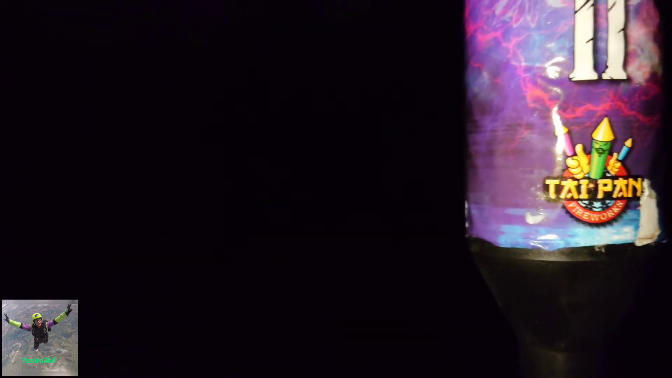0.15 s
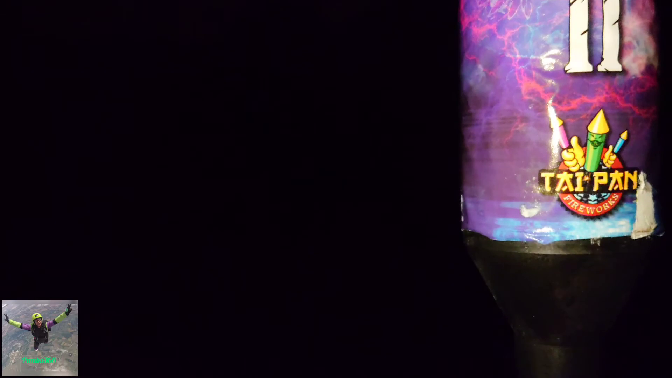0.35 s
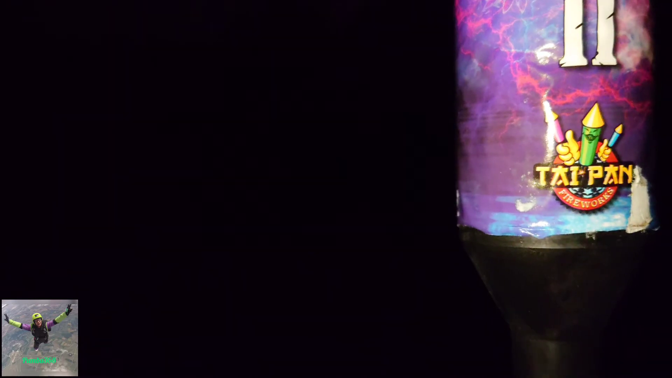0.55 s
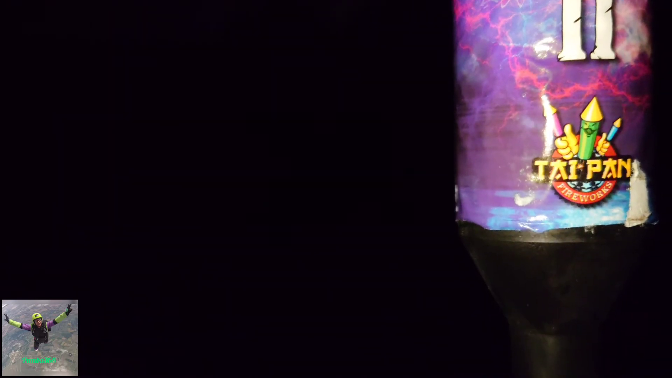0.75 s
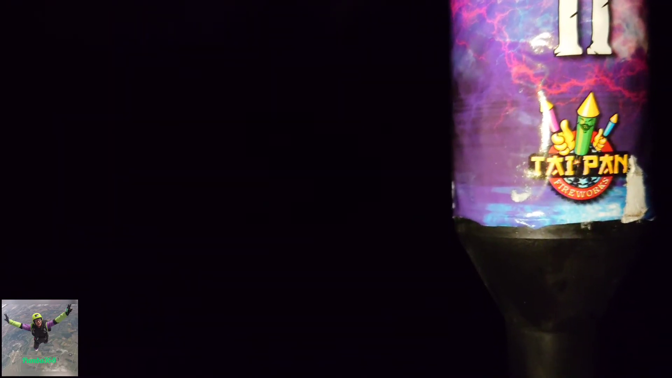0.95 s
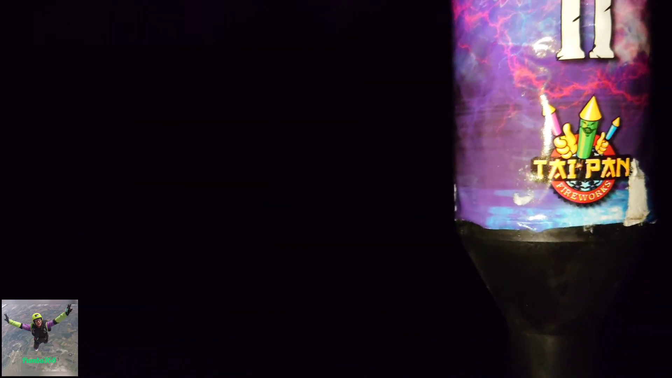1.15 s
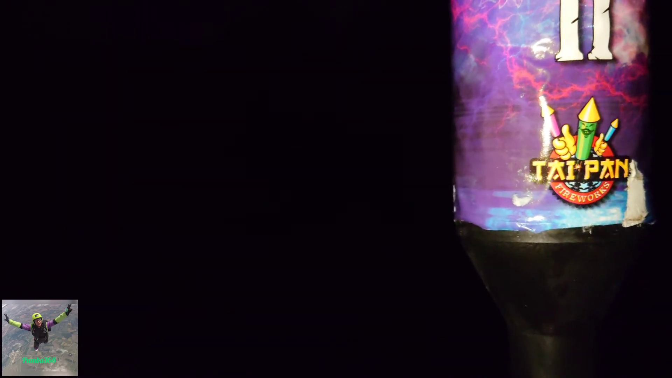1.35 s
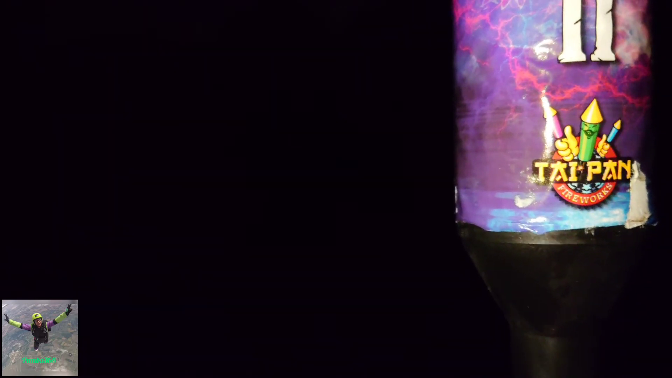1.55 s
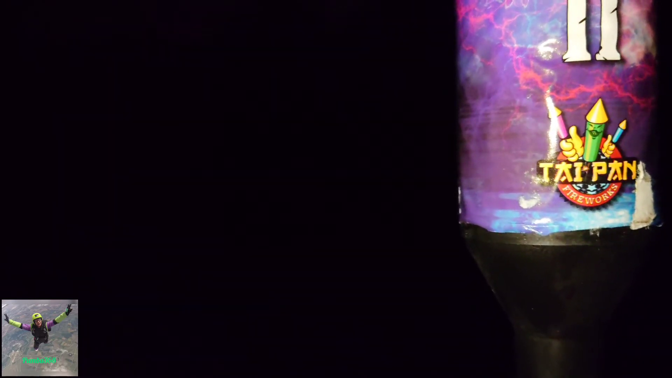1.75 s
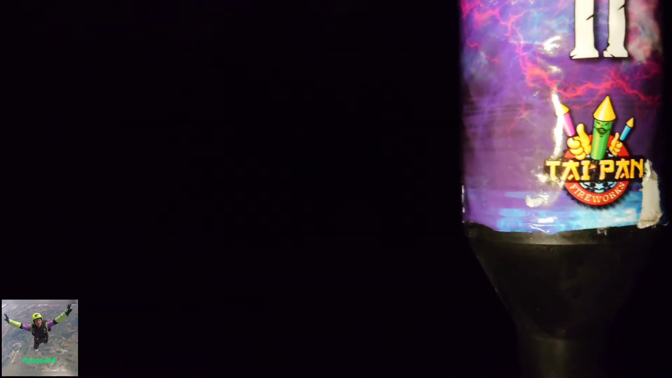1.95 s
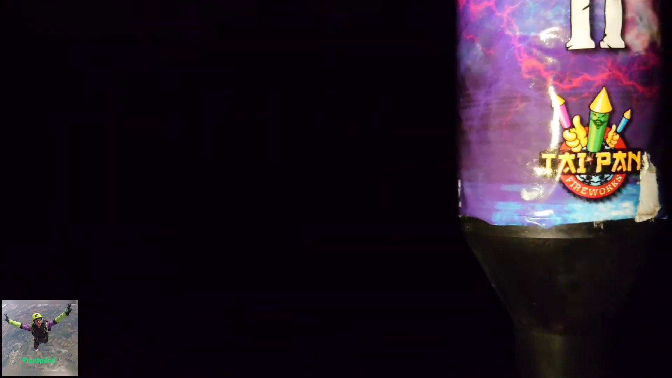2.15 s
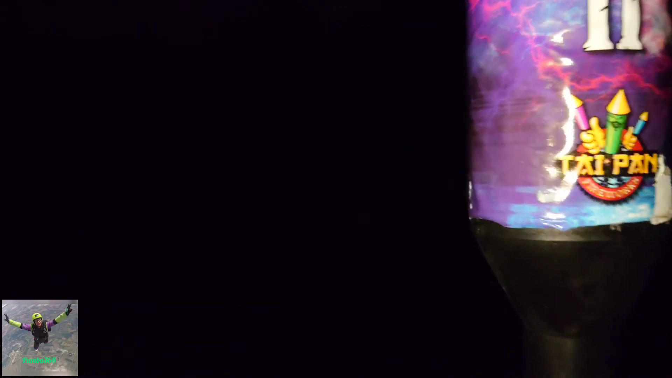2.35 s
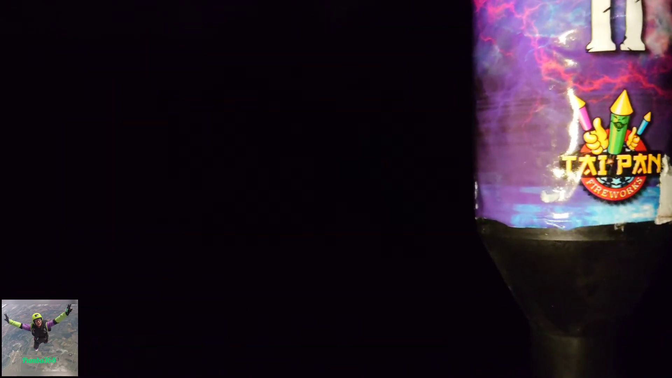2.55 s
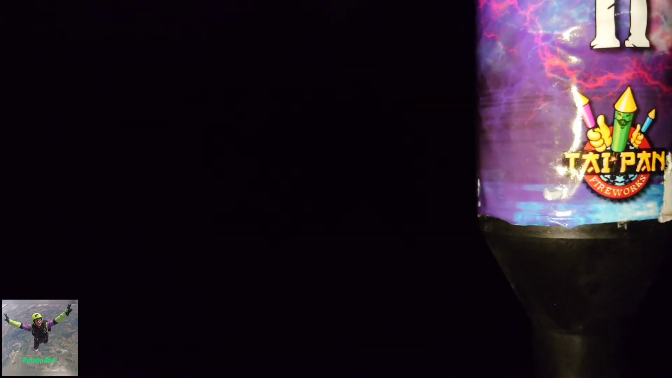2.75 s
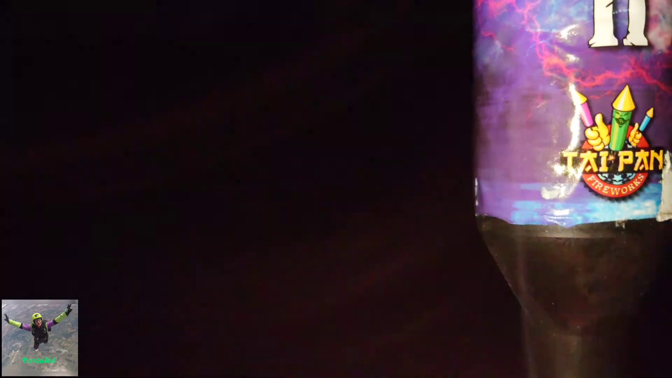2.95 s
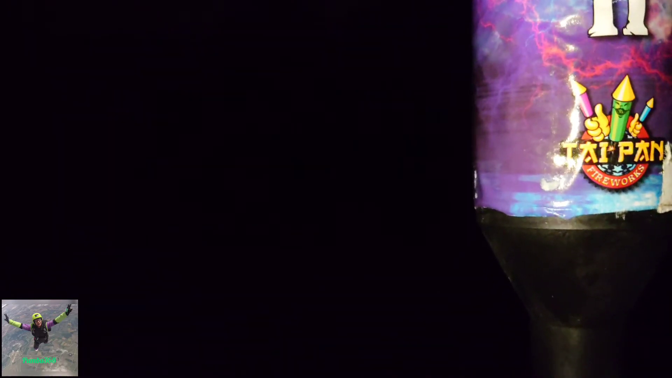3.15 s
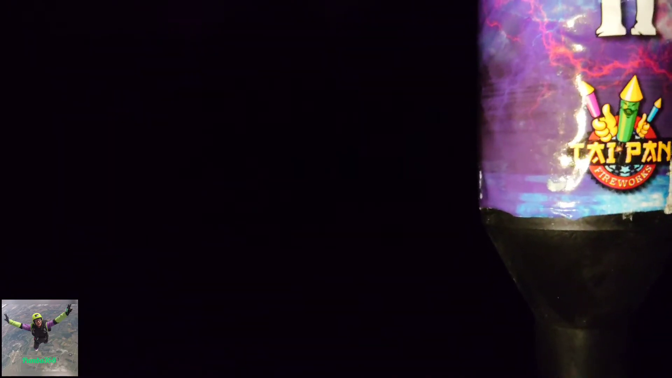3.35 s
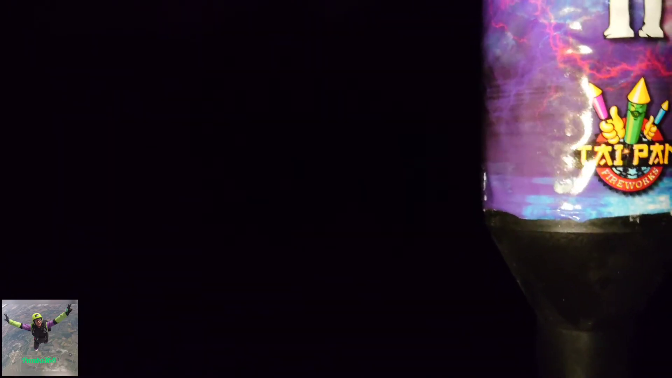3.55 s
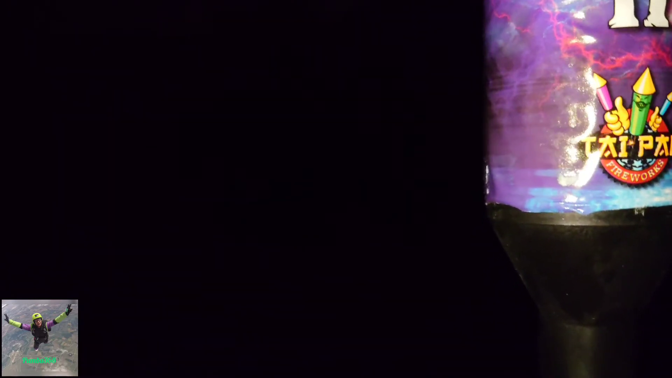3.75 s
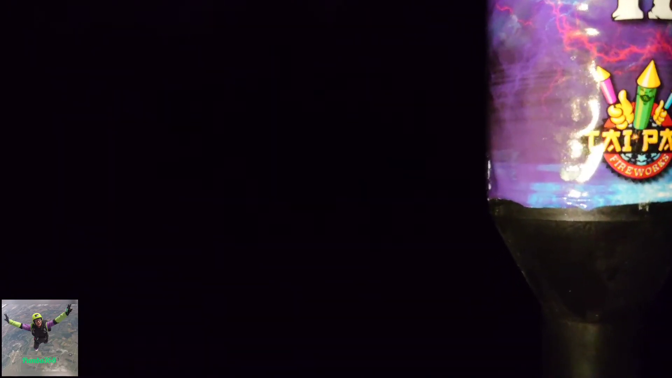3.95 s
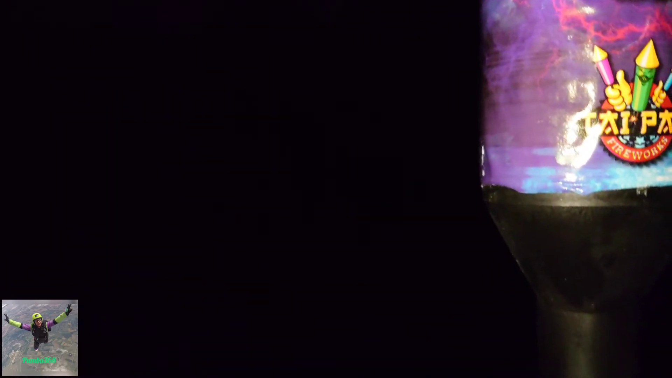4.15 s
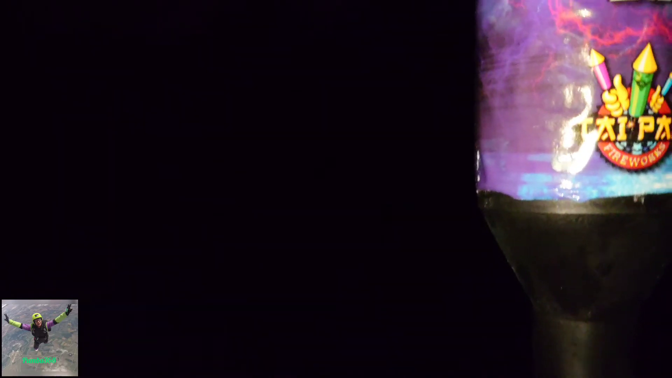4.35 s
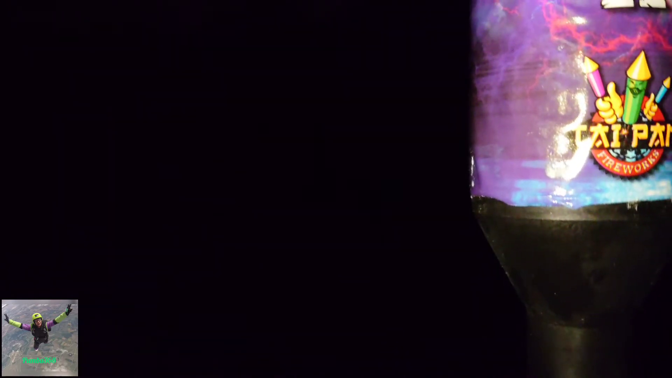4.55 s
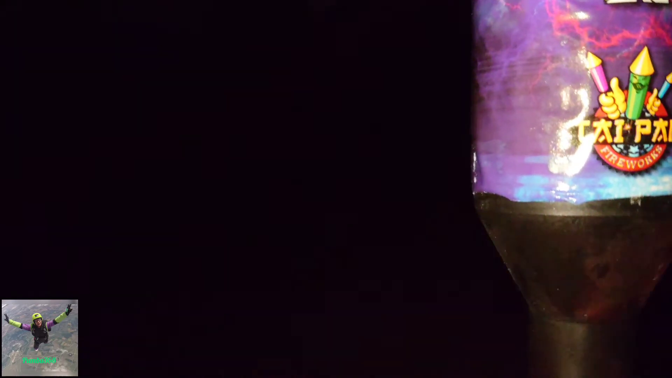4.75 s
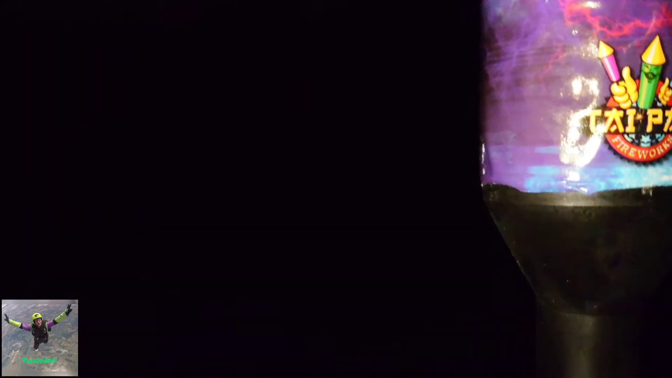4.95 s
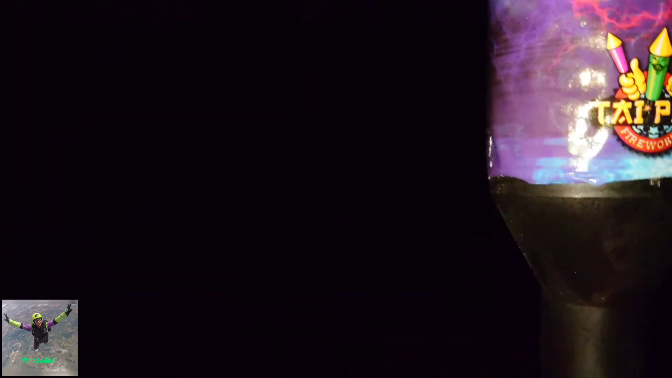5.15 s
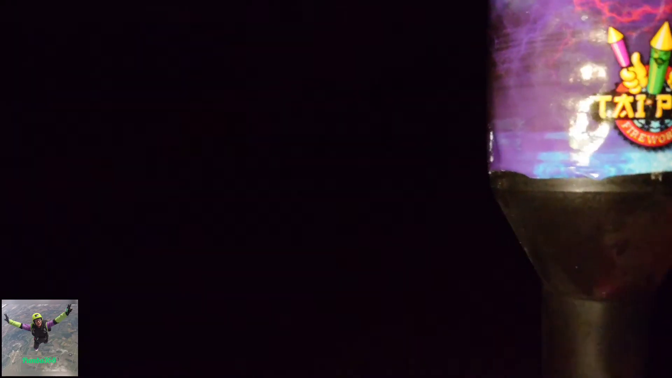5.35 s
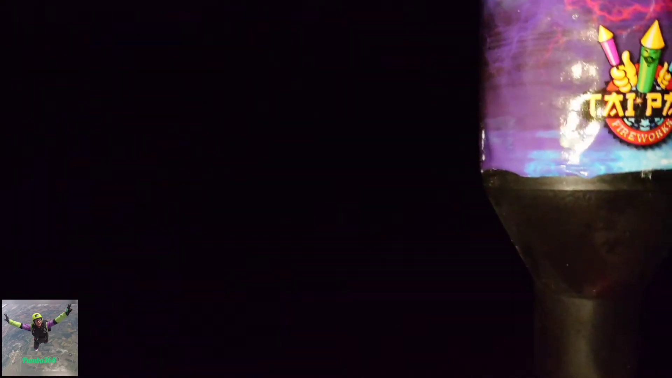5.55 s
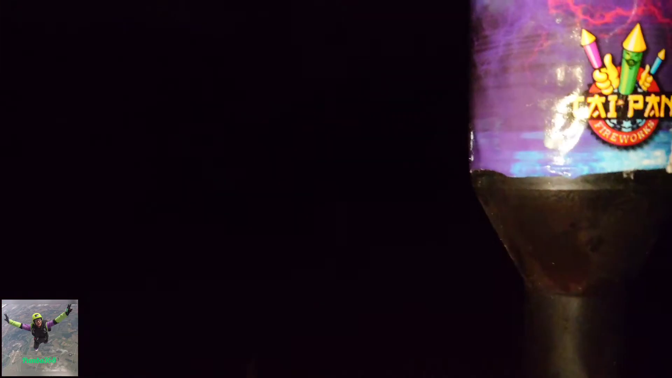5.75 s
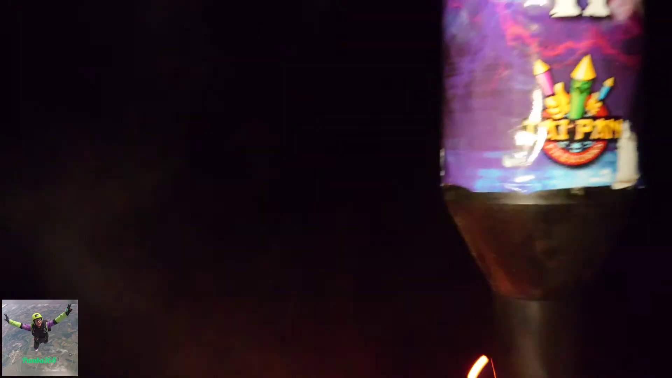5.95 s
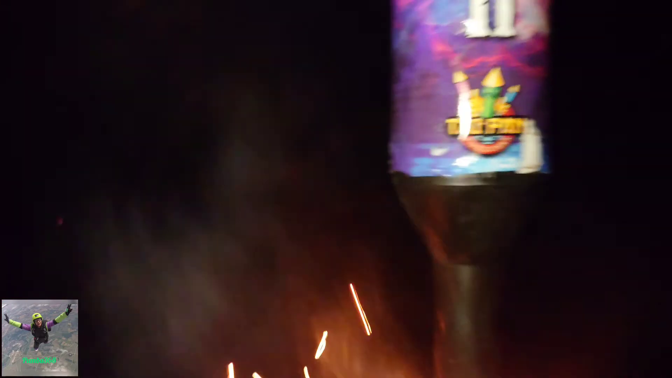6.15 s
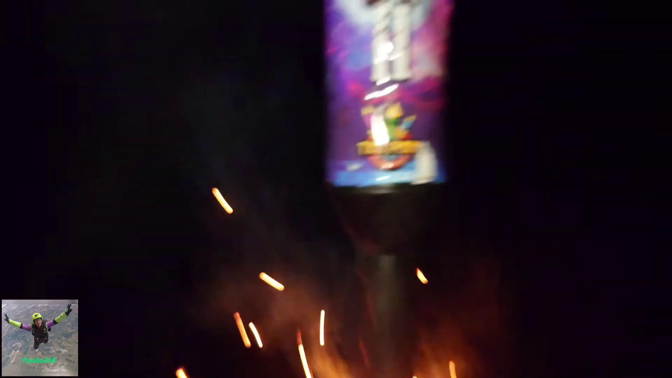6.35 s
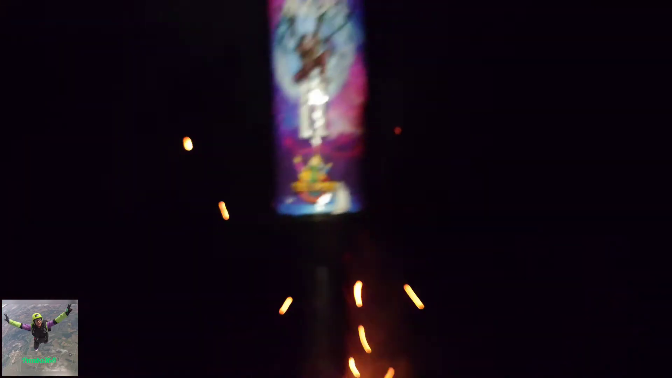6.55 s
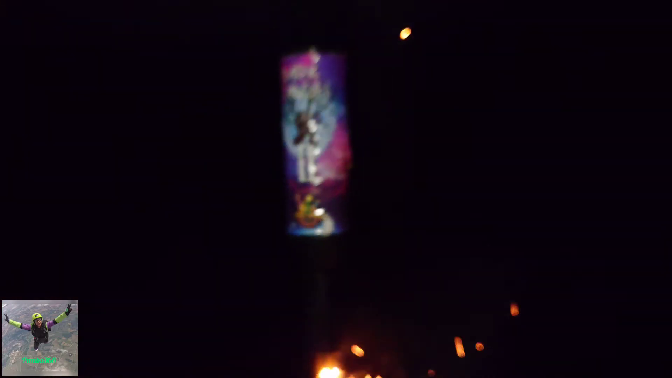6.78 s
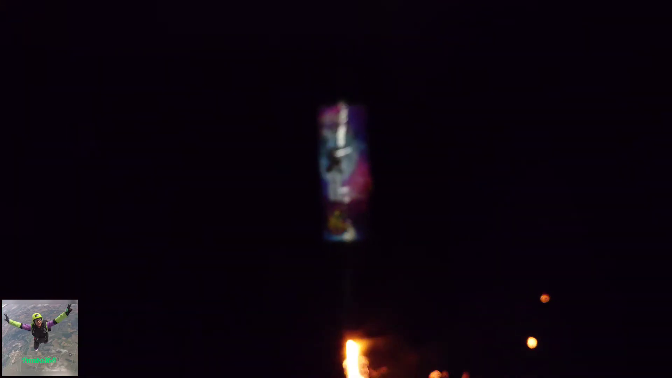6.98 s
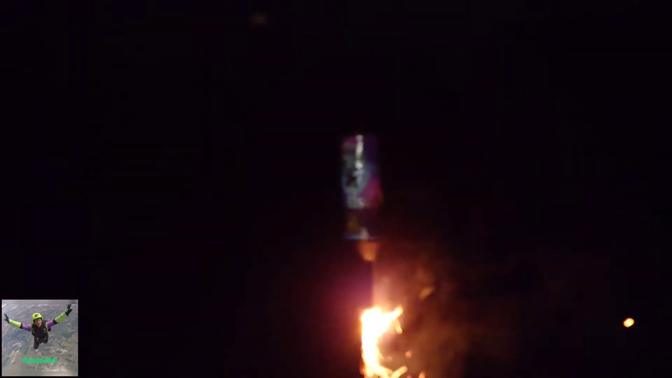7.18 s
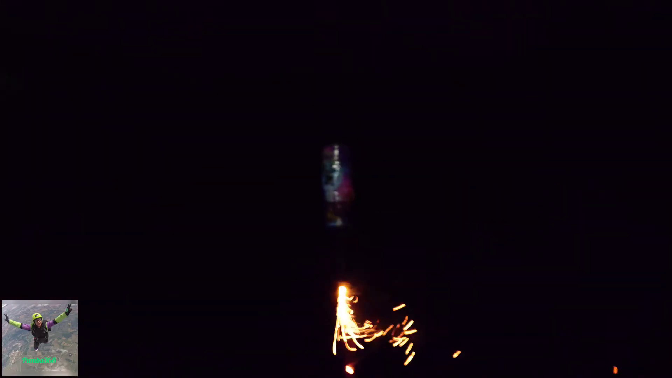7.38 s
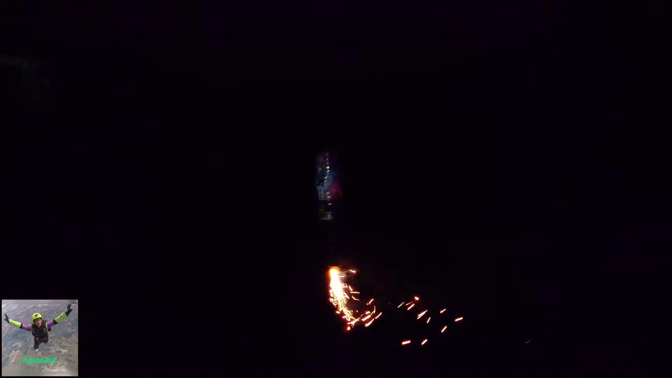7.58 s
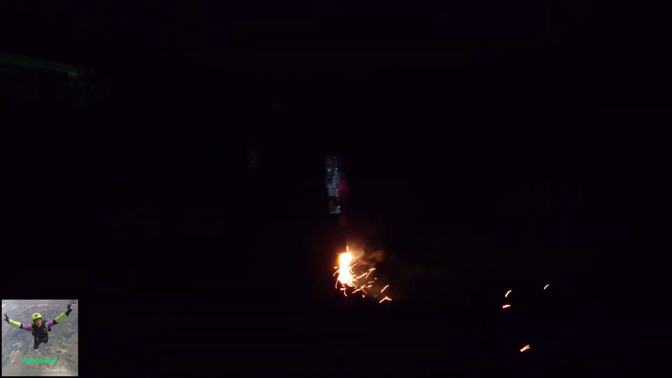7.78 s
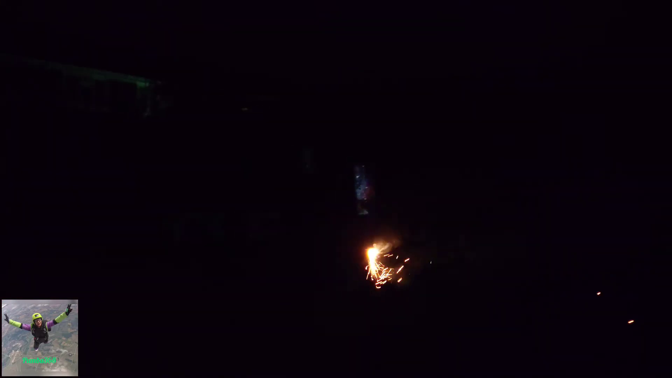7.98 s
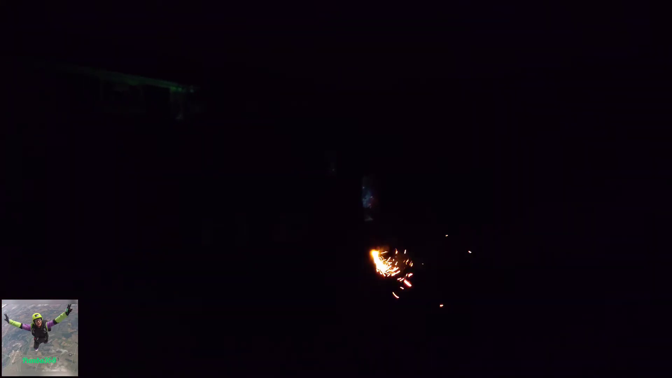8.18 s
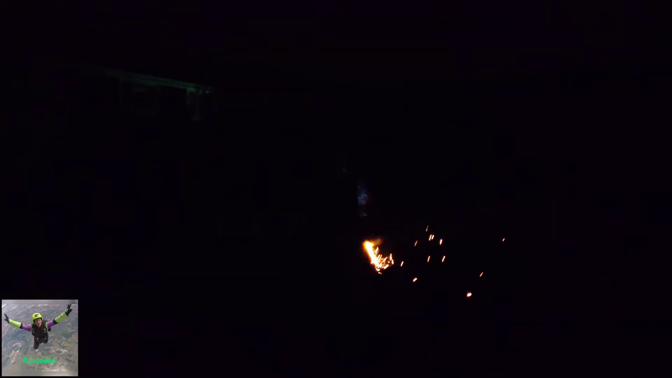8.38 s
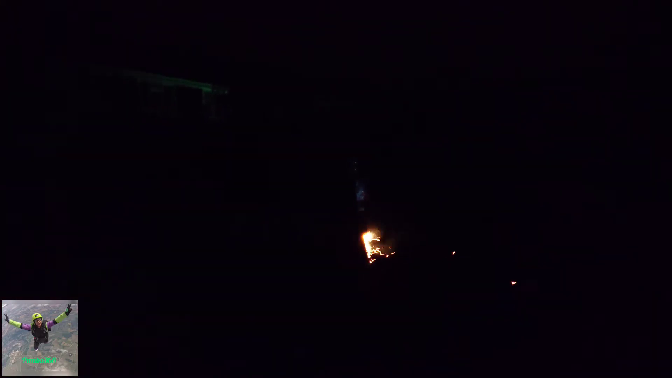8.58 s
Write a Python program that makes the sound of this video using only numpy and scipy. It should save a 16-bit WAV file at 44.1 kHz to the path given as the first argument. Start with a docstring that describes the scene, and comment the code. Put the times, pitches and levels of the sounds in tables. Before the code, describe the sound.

Sharp flint clicks in a quiet night yard, brief gritty sputtering, then a sudden fierce fizzing jet that fades as the microphone backs away.

```python
"""A firework fuse sprays sparks at night: a turbulent jet, made of gritty noise split into roar, hiss and fizz.
Before it the fuse spits, as short bursts of grainy noise; late in the spray an ember bursts with a thud and a crack.
First a lighter's flint wheel is nudged twice and fully struck five times: scrapes, snaps and knocks of shaped noise.
A hand-held phone backs away from the spray; its two microphone ports differ in colour, delay and correlation.
Beneath lie a faint yard echo, distant night noise, light air on the ports and the rustle of the hand."""
import sys
import numpy as np
from scipy import signal
from scipy.fft import rfft, irfft, next_fast_len
from scipy.io import wavfile
from scipy.ndimage import uniform_filter1d, map_coordinates

SR = 44100
rng = np.random.default_rng(int(sys.argv[2]) if len(sys.argv) > 2 else 0)


def transcribe(u):
    """Save the signal u as a 16-bit wav file named by the first command-line argument.

    u: samples, shape (n,) or (channels, n), limited to [-1, 1]; the rate is SR.
    q: integer samples, one column per channel.
    """
    v = np.clip(np.atleast_2d(u).T, -1, 1)
    q = np.round(v * 32767).astype(np.int16)
    wavfile.write(sys.argv[1], SR, q)


N = 380141

IGNITE_S = 5.624  # the powder ignites
# Spectrum of the jet. Each row: frequency in Hz, relative level per Hz in dB.
JET_SPECTRUM = [(60, -26), (110, -17.5), (200, -7), (450, -1.5), (1100, -2.5), (2000, 1.5), (3400, 3),
                (4800, -0.3), (6400, -9), (7900, -2.5), (11000, -6.5), (13000, -4), (15800, -7.5)]
# Spectrum of sparks and bursting grains. Each row: frequency in Hz, relative level per Hz in dB.
FLINT_SPECTRUM = [(200, -21), (700, -21.5), (1800, -3), (3100, 1.5), (4500, 0), (6400, -2), (7900, 4),
                  (9800, -5.5), (12500, 0), (15300, 3), (16000, -7)]
# Low boom of the flame while the phone is close. One row: centre in seconds, half-length in seconds,
# level relative to the hiss in dB.
BOOM = (6.24, 0.2, -27)
# The hiss takes on a bright edge. Each row: centre in seconds, half-length in seconds, frequency in Hz,
# half-width in Hz, boost in dB.
BRIGHT_EDGES = [(6.711, 0.19, 7950, 1510, 6), (8.303, 0.38, 4600, 700, 4.5)]
# The phone backs away. Each row: time in seconds, distance in metres, delay of the left port behind
# the right in milliseconds, port colour from 0 close, 1 a step back, 2 away to 3 far (held at 3 above that).
PHONE_PATH = [(5.78, .19, 0.34, 0), (6.02, 0.22, 0.26, 0.5), (6.25, 0.37, .24, 0.15),
              (6.5, 0.32, 0.17, 1.5), (6.75, 0.42, 0.13, 0.85), (7.15, 0.82, 0.2, 1.4),
              (7.7, 1.29, 0.15, 2), (7.93, 1.79, .21, 2.5), (8.6, 2.12, 0.2, 3.5)]
# Similarity of the two ports. Each row: frequency in Hz, correlation from 0 to 1.
PORT_LIKENESS = [(60, .45), (300, 1), (1000, 1), (2000, 0.79), (2600, 1), (3200, 0.89), (3900, 0.43),
                 (5200, 0.15), (7700, 0.64), (10000, .22), (15000, 0.21)]
# Left port relative to right at four places along the path. Each row: frequency in Hz, gain in dB.
PORT_CLOSE = [(500, -1.2), (1100, 3), (2000, 7.5), (3000, -6), (4000, -2.5), (5000, -1.5), (6200, -1.5),
              (7400, -3), (8600, -12), (9700, -16), (11500, 5), (13000, 0.5), (15500, -11.5)]
PORT_STEP_BACK = [(500, -0.5), (1100, 1.1), (2000, 6), (3000, 1.5), (4000, -18), (5000, -16), (6200, 4.5),
                  (7400, 4), (8600, -5), (9700, 0), (11500, -10), (13000, 2), (15500, -3.5)]
PORT_AWAY = [(500, -3), (1100, 3.5), (2000, 6), (3000, 5), (4200, -11), (5000, -13), (6200, -3), (7400, 1),
             (8600, -3.5), (9700, -1), (11500, -6), (13000, -9), (15500, 0)]
PORT_FAR = [(500, -2.5), (1100, 1), (2200, 6.5), (3000, 2.5), (4100, -13), (4900, -6), (6200, -15),
            (7600, -10), (8700, -10), (9800, 0.5), (11500, -7), (13000, -5), (15500, -5)]


def spray():
    """Turbulent mixing noise: burning powder drives a jet with a low roar, a hiss and a fizz of bursting grains."""
    level_db, roar_db, fizz_db = burn()
    lit = np.clip((clock() - IGNITE_S) / 0.008, 0, 1)
    jet = coloured(patchy(gritty(grain_db=1.16, rate=3000), depth_db=1.5), JET_SPECTRUM)

    def below(hz, edge_hz):
        """Low-pass response: nearly full gain below the edge, falling steeply above."""
        return 1 / (1 + (hz / edge_hz) ** 8)

    roar = unit(filtered(jet, lambda hz: below(hz, 1240)))
    hiss = unit(filtered(jet, lambda hz: below(hz, 5660) - below(hz, 1300)))
    fizz = unit(filtered(jet, lambda hz: 1 - below(hz, 5380)))
    # single grains burst with a tiny crack, 45 a second on average
    cracks = (rng.random(N) < 45 / SR) * rng.standard_normal((2, N)) * amp(19.0)
    treble = fizz + coloured(cracks, FLINT_SPECTRUM)
    roar_gain = amp(roar_db + 0.14 * wobble(30))
    treble_gain = amp(fizz_db + 0.73 * wobble(25))
    flow = hiss + roar_gain * roar + treble_gain * treble
    boom_s, boom_length, boom_db = BOOM
    boom = unit(band(jet, centre_hz=140, width_hz=45))
    flow = flow + amp(boom_db) * swell(boom_s, boom_length) * boom
    for s, half_length, hz, width_hz, db in BRIGHT_EDGES:
        flow = flow + (amp(db) - 1) * swell(s, half_length) * band(flow, hz, width_hz)
    pair = lit * amp(level_db + 0.76 * wobble(45)) * flow
    # the left port's colour crossfades between neighbouring places on the path
    position = np.clip(curves(PHONE_PATH)[2], 0, 3)
    heard = np.zeros((2, N))
    for place, shade in enumerate([PORT_CLOSE, PORT_STEP_BACK, PORT_AWAY, PORT_FAR]):
        share = np.clip(1 - abs(position - place), 0, 1)
        heard += share * ports(pair, PORT_LIKENESS, shade)
    return heard


JET_DB = -44  # hiss at 1 m, before flares and flicker
ATTACK_S, ATTACK_DB = 0.074, 15.5  # build-up time, and how far below full level the jet begins
# The jet flares up. Each row: centre in seconds, half-length in seconds, change of the whole jet in dB,
# additional change of the roar in dB.
FLARES = [(5.746, 0.021, 2, -2), (6.127, 0.035, 2, 1), (6.487, .05, 0.5, 1), (6.99, 0.12, 1.5, -2),
          (7.267, 0.057, 1, 2.5), (7.45, 0.033, 2, 4), (8.315, 0.073, 4, -4)]
# Balance of the jet. Each row: time in seconds, roar relative to the hiss in dB, fizz likewise in dB.
JET_COLOUR = [(5.7, -8.5, -1), (6.3, -5.5, 3), (6.8, -10.5, 1.5), (7.2, -11, -2.5), (7.7, -9.5, 4.5),
              (8.2, -5, 3.5), (8.6, -6, 3)]


def burn():
    """Spherical spreading: level falls 6 dB per doubled distance, under the build-up and flares of the jet."""
    distance_m = curves(PHONE_PATH)[0]
    roar_db, fizz_db = curves(JET_COLOUR)
    build_up = np.clip((clock() - IGNITE_S) / ATTACK_S, 0, 1)
    level_db = JET_DB - 20 * np.log10(distance_m) - ATTACK_DB * (1 - build_up)
    for s, half_length, db, extra_roar_db in FLARES:
        flare = swell(s, half_length)
        level_db = level_db + db * flare
        roar_db = roar_db + extra_roar_db * flare
    return level_db, roar_db, fizz_db


CATCH_S = 5.33  # random short spits fill in from here until the powder ignites
SPITS_PER_S, SPIT_DB, SPIT_SCATTER_DB, SPIT_S = 45, -50.5, -4, 0.003  # the random spits
# Spits at set times. Each row: start in seconds, level in dB before the mix gains, length in seconds.
SET_SPITS = [(5.223, -52, .015), (5.251, -50, 0.023), (5.378, -41.5, 0.0082), (5.395, -45, 0.013),
             (5.417, -51, 0.014), (5.457, -49.5, 0.015), (5.472, -43.5, 0.0097), (5.502, -44.5, 0.016),
             (5.56, -51, 0.0044), (5.582, -48, .004), (5.615, -51, 0.0039)]
# Left port relative to right for the lighter and fuse tip. Each row: frequency in Hz, gain in dB.
PORT_LIGHTER = [(500, -2.5), (1000, 3), (1700, 3.5), (2500, 4), (3500, -14), (5000, -8.5), (6500, -22.5),
                (7700, -13.5), (8700, -8.5), (10800, -16), (12500, -8.5), (15500, -10.5)]


def sputter():
    """Intermittent combustion: the fuse tip catches in gritty bursts; random short spits fill in among set ones."""
    t = clock()
    spits = list(SET_SPITS)
    for k, (shift, size) in enumerate(rng.standard_normal((40, 2))):
        start = CATCH_S + (k + 0.24 * shift) / SPITS_PER_S
        if start < IGNITE_S:
            spits.append((start, SPIT_DB + SPIT_SCATTER_DB * size, SPIT_S))
    power = np.zeros(N)
    for s, db, length in spits:
        near = abs(t - s) < 0.1
        u = t[near] - s
        rise = np.minimum(u, 0) / 0.00087
        decay = np.maximum(u - length, 0) / 0.0037
        power[near] += amp(db) ** 2 * np.exp(rise - decay)
    crackle = coloured(np.sqrt(power) * gritty(grain_db=7, rate=1200), FLINT_SPECTRUM)
    puffs = coloured(np.sqrt(power) * gritty(grain_db=3.5, rate=600), JET_SPECTRUM)
    return ports(amp(-0.5) * puffs + amp(-8) * crackle, PORT_LIKENESS, PORT_LIGHTER)


EMBER_AT_S, EMBER_HALF_WIDTH_S = 8.5905, 0.004
THUD_DB, CRACK_DB = -32.5, -36.5
# Spectrum of the thud. Each row: frequency in Hz, relative level per Hz in dB.
THUD_SPECTRUM = [(150, -22), (500, -18), (1100, 0), (1900, -1.5), (4000, -13), (9000, -14)]


def ember():
    """Impulsive release: a lump of powder bursts with a thud and a thin crack under one brief envelope."""
    burst = np.exp(-np.minimum(abs(clock() - EMBER_AT_S) / EMBER_HALF_WIDTH_S, 20))
    thud = amp(THUD_DB) * coloured(burst * white(), THUD_SPECTRUM)
    crack = amp(CRACK_DB) * coloured(burst * white(), FLINT_SPECTRUM)
    return ports(thud + crack, PORT_LIKENESS, PORT_FAR)


# Turns of the flint wheel, two nudges and five full strokes. Each row: time of the peak in seconds,
# scrape level in dB before colouring, run-up in seconds, run-out in seconds, rasp boost near 4.3 kHz in dB,
# zing boost near 7.65 kHz in dB.
STROKES = [(.3, -50.5, .014, 0.062, 8.5, 3), (.491, -29, 0.047, 0.071, 0.5, 3.5),
           (.865, -47, .015, 0.055, 7, 5.5), (1.046, -38, 0.076, .12, -1.5, 3),
           (2.381, -29, 0.065, 0.081, 0, 0), (3.032, -32.5, 0.047, 0.069, 3.5, 4.5),
           (4.718, -28, 0.05, .06, 0.5, -1)]
# Sparks snapping off the flint and clicks of the lighter. Each row: time in seconds, snap level in dB
# before colouring, half-width in seconds, knock relative to the snap in dB.
SNAPS = [(.298, -47, 0.0023, -20), (.456, -51, .003, -24), (.483, -39, 0.0039, -26.5),
         (.493, -30.5, .0012, -16), (.496, -24, .0014, -8.5), (0.864, -47.5, .0024, -16.5),
         (1.0442, -29.5, 0.0013, -26.5), (1.048, -18, 0.0016, -18.5), (1.056, -40.5, .0005, -20.5),
         (1.0712, -38, .0005, -16.5), (2.151, -54.5, .0025, -15), (2.185, -56, 0.0024, -6.5),
         (2.362, -39.5, 0.0017, -21.5), (2.3826, -21, 0.0014, -13), (2.383, -17.5, 0.00022, -22.5),
         (2.457, -40, 0.0011, -8.5), (2.4617, -29.5, 0.0012, -12), (2.814, -59.5, .002, 11),
         (3.032, -23.5, 0.0008, -6), (3.034, -26.5, 0.00075, -2), (3.438, -54.5, 0.0024, -8),
         (3.611, -60, 0.0023, 10.5), (3.726, -54.5, 0.0015, 0), (3.812, -58.5, 0.0019, 6),
         (4.021, -55.5, 0.0012, -3), (4.586, -45, 0.0024, -18), (4.693, -44.5, .00085, -17.5),
         (4.7194, -23, 0.0012, -18.5), (4.7206, -15, 0.00045, -19), (4.838, -52.5, .0015, 3),
         (4.935, -46, 0.00092, -13)]
# Spectrum of a dull knock. Each row: frequency in Hz, relative level per Hz in dB.
KNOCK_SPECTRUM = [(80, -14), (180, -12), (380, -3), (750, -5), (1200, -3.5), (1800, 1), (2400, -1),
                  (4000, -8), (9000, -36.5)]


def lighter():
    """Frictional excitation: the wheel speeds up over the flint, sparks snap off and the body knocks."""
    t = clock()
    scrape, snap_power, knock_power = np.zeros((3, N))
    for s, db, run_up, run_out, *_ in STROKES:
        near = abs(t - s) < 0.3
        u = t[near] - s
        # 60 dB below the peak at either end of the stroke
        scrape[near] += amp(db - 60 * np.maximum(-u / run_up, u / run_out) ** 1.05)
    for s, db, width, knock_db in SNAPS:
        near = abs(t - s) < 0.05
        u = t[near] - s
        snap_power[near] += amp(db) ** 2 * np.exp(-2 * abs(u / width) ** 1.5)
        knock_shape = np.exp(-2 * np.maximum(-u * 1.6, u / 2) / (width + 0.00054))
        knock_power[near] += amp(db + knock_db) ** 2 * knock_shape
    scraping = scrape * gritty(grain_db=4, rate=550)
    snapping = np.sqrt(snap_power) * gritty(grain_db=1.5, rate=4600)
    pair = coloured(scraping + snapping + gas(), FLINT_SPECTRUM)
    # the thumb damps the metal hood differently on each stroke
    *_, rasp_db, zing_db = curves(STROKES)
    rasp = (amp(rasp_db) - 1) * band(pair, 4300, 1000)
    zing = (amp(zing_db) - 1) * band(pair, 7650, 550)
    knock = coloured(np.sqrt(knock_power) * white(), KNOCK_SPECTRUM)
    return lagged(ports(pair + rasp + zing + knock, PORT_LIKENESS, PORT_LIGHTER), lag_ms=0.3)


HISS_FLOOR_DB = -85  # faint constant background hiss, before colouring
# Puffs of gas. Each row: centre in seconds, half-length in seconds, level in dB before colouring.
GAS_PUFFS = [(3.62, 0.065, -70), (4.08, 0.11, -66.5), (4.82, 0.097, -64)]


def gas():
    """Orifice noise: bell-shaped puffs of gas over a faint constant background hiss."""
    puffs = sum(amp(db) * swell(s, half_length) for s, half_length, db in GAS_PUFFS)
    return (amp(HISS_FLOOR_DB) + puffs) * gritty(grain_db=1.5, rate=130)


# Decay of the yard. Each row: frequency in Hz, time to fall by 60 dB in seconds.
YARD_DECAY = [(200, 0.27), (2000, 0.26), (8000, 0.19), (15000, 0.21)]


def yard(x):
    """Exponential reverberant decay: the faint answer of the ground and far walls to the right channel."""
    hz, t, z = signal.stft(rng.standard_normal((2, SR // 2)), SR, nperseg=256)
    decay = amp(-60 * t / along(YARD_DECAY, hz)[:, None])
    tail = signal.istft(z * decay, SR, nperseg=256)[1]
    return signal.fftconvolve(x[1:], tail / np.linalg.norm(tail[0]), axes=1)[:, :N]


NIGHT_DB, NIGHT_DB_PER_S = -57.5, -0.3947  # starting level and slow fade
# Spectrum of the distance. Each row: frequency in Hz, relative level per Hz in dB.
NIGHT_SPECTRUM = [(50, -27.5), (90, -9), (200, -15.5), (330, -14), (450, -6), (660, -5), (900, -3),
                  (1150, -9), (1450, -7.5), (1920, -7.5), (2430, -11), (3210, -19), (6500, -30),
                  (15000, -43.5)]
# Similarity of the ports for distant sound. Each row: frequency in Hz, correlation from 0 to 1.
NIGHT_LIKENESS = [(100, 0.24), (300, 0.39), (700, 0), (1500, 0), (3000, 0.0063), (15000, 0)]


def night():
    """Diffuse field: far-off noise of the surroundings reaches the two ports almost uncorrelated."""
    far = coloured(patchy(white(), depth_db=1.8), NIGHT_SPECTRUM)
    return amp(NIGHT_DB + NIGHT_DB_PER_S * clock()) * ports(far, NIGHT_LIKENESS)


# Strength of the air on the ports. Each row: time in seconds, level in dB before random flutter.
BREEZE = [(0, -69), (.57, -53.5), (1.4, -66), (1.55, -56.5), (2.01, -66), (2.35, -54), (2.7, -64),
          (3.02, -57), (3.5, -65), (4.4, -71), (5.05, -61), (6.8, -67), (7.5, -65.5), (7.9, -86),
          (8.5, -63.5)]
# Spectrum of the air. Each row: frequency in Hz, relative level per Hz in dB.
RUMBLE_SPECTRUM = [(10, -10), (25, -0.5), (45, 1.5), (58, 4.5), (80, -3), (120, -8.5), (200, -15),
                   (500, -56)]


def breeze():
    """Turbulent pressure fluctuation: light air on the ports makes a fluttering low rumble."""
    rumble = ports(coloured(white(), RUMBLE_SPECTRUM), [(50, 0.13)])  # correlation 0.13 throughout
    return amp(curves(BREEZE)[0] + 2.8 * wobble(10)) * rumble


HAND_DB = -77.5  # rustle of the hand at rest, before colouring
REGRIP_S, REGRIP_HALF_LENGTH_S, REGRIP_DB = 1.39, 0.52, -64.5  # the hand shifts its grip
# Fingers bump the case. Each row: time in seconds, level in dB before colouring.
BUMPS = [(1.154, -48), (1.208, -56), (1.475, -55), (1.519, -53), (1.641, -48.5), (1.721, -50.5),
         (1.775, -54.5), (5.314, -56)]
# Spectrum of handling noise. Each row: frequency in Hz, relative level per Hz in dB.
HAND_SPECTRUM = [(50, -12.5), (130, -1.5), (450, 1), (800, -8), (2000, -13.5), (6000, -44.5)]


def hand():
    """Structure-borne noise: the hand rustles on the phone, shifts its grip and bumps the case."""
    t = clock()
    grip = amp(HAND_DB) + amp(REGRIP_DB) * swell(REGRIP_S, REGRIP_HALF_LENGTH_S)
    rustle = grip * gritty(grain_db=4.5, rate=44)
    bumps = np.zeros(N)
    for s, db in BUMPS:
        decay = np.maximum((s - t) / 0.0022, (t - s) / 0.0062)
        bumps += amp(db) * np.exp(-np.minimum(decay, 20))
    return ports(coloured(rustle + bumps * white(), HAND_SPECTRUM), PORT_LIKENESS)


def ports(pair, alike, shade=((1000, 0),)):
    """Partial coherence: the right port hears the first signal; the left shares part of it, coloured by the case."""
    def mix(hz):
        """Left-port weights of the shared and the unrelated signal, keeping their power sum."""
        likeness = np.clip(along(alike, hz), -1, 1)
        return amp(along(shade, hz)) * np.array([likeness, np.sqrt(1 - likeness ** 2)])

    left = filtered(pair, mix).sum(axis=0)
    return np.array([left, pair[0]])


def lagged(pair, lag_ms, knee_hz=1000):
    """Group delay: above a knee the left port falls behind the right; the bass stays in step."""
    left, right = pair
    treble = filtered(left, lambda hz: hz > knee_hz)
    lag_s = lag_ms / 1000
    wave = signal.hilbert(treble, next_fast_len(N))[:N]
    late = map_coordinates(wave, [np.arange(N) - lag_s * SR], order=5)
    # turn the phase back so that the shift is zero at the knee
    late = late * np.exp(2j * np.pi * knee_hz * lag_s)
    return np.array([left - treble + late.real, right])


def gritty(grain_db, rate):
    """Amplitude modulation: two noises broken into the same tiny grains, rate random knots a second."""
    return unit(white() * amp(grain_db * wobble(rate)))


def patchy(x, depth_db):
    """Spectro-temporal modulation: smoothed random patches of gain over time and frequency, at rms 1."""
    z = signal.stft(x, nperseg=512)[2]
    field = rng.standard_normal(z.shape[1:])
    field = uniform_filter1d(field, size=7, axis=0)
    field = uniform_filter1d(field, size=8, axis=1)
    return unit(signal.istft(z * amp(depth_db * unit(field)), nperseg=512)[1][:, :N])


def coloured(x, spectrum):
    """Spectral shaping: x takes on the spectrum; white noise keeps its power."""
    return filtered(x, lambda hz: unit(amp(along(spectrum, hz))))


def band(x, centre_hz, width_hz):
    """Band-pass filtering: the part of x under a bell-shaped response around one frequency."""
    return filtered(x, lambda hz: np.exp(-((hz - centre_hz) / width_hz) ** 2))


def filtered(x, response):
    """Linear filtering: the spectrum of x times a response given as a function of frequency in Hz."""
    m = next_fast_len(N + 8192)
    return irfft(rfft(x, m) * response(np.fft.rfftfreq(m, 1 / SR)), m)[..., :N]


def white():
    """White noise: two unrelated signals with equal power at all frequencies."""
    return rng.standard_normal((2, N))


def wobble(rate):
    """Band-limited fluctuation: a smooth random curve with rate knots a second."""
    knots = rng.standard_normal(int(N * rate / SR) + 4)
    return map_coordinates(knots, [np.arange(N) * rate / SR])


def swell(s, half_length):
    """Gaussian envelope: a bell-shaped rise and fall around time s."""
    return np.exp(-((clock() - s) / half_length) ** 2)


def curves(rows):
    """Linear interpolation: one value per sample for each column after the time."""
    s, *cols = np.transpose(rows)
    return [np.interp(clock(), s, c) for c in cols]


def along(points, hz):
    """Logarithmic frequency scale: (Hz, value) points interpolated on a log axis."""
    f, v = np.transpose(points)
    return np.interp(np.log(hz + 1), np.log(f + 1), v)


def clock():
    """Uniform sampling: the time of every sample in seconds."""
    return np.arange(N) / SR


def unit(x):
    """Power normalisation: x at rms 1."""
    return x / np.sqrt(np.mean(x ** 2) + 1e-20)


def amp(db):
    """Logarithmic level: decibels to amplitude gain."""
    return 10 ** (np.asarray(db) / 20)


def scene():
    """Superposition: fuse, lighter, their yard echo and the background add as pressures."""
    fuse = lagged(spray() + sputter() + ember(), curves(PHONE_PATH)[1])
    strikes = lighter()
    echo = yard(amp(-22) * fuse + amp(-21) * strikes)
    return fuse + strikes + echo + night() + breeze() + hand()


TOP_HZ = 15950  # band limit of the phone


def record(dry):
    """Band limitation: the phone's response falls extremely steeply above its band limit."""
    return filtered(dry, lambda hz: 1 / (1 + (hz / TOP_HZ) ** 200))


dry = scene()
out = record(dry)
transcribe(out)
```